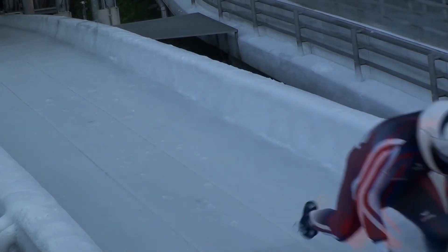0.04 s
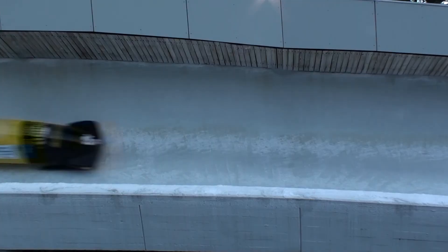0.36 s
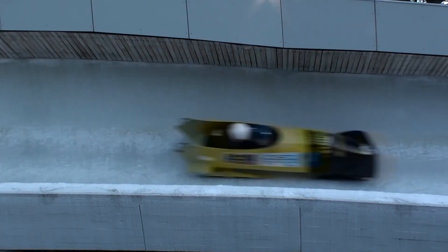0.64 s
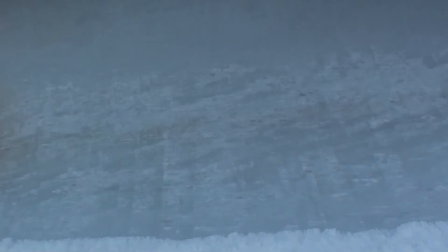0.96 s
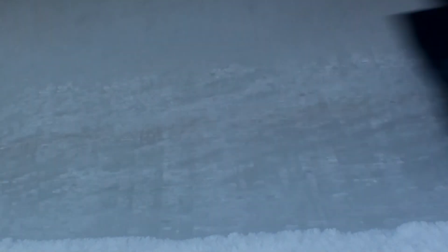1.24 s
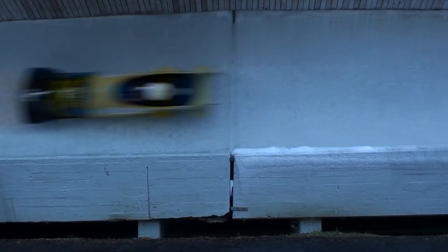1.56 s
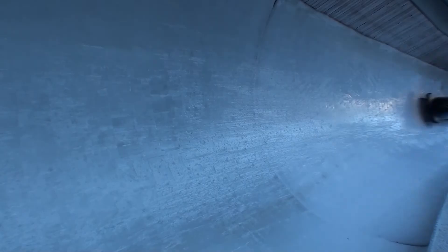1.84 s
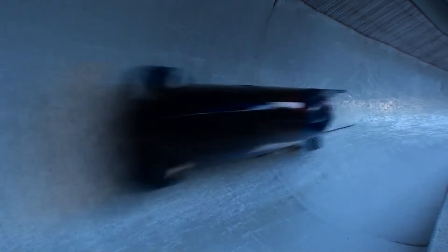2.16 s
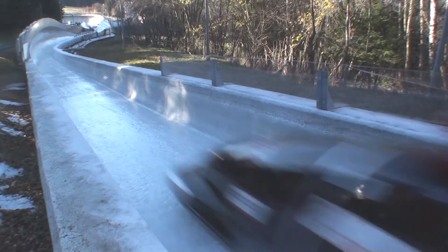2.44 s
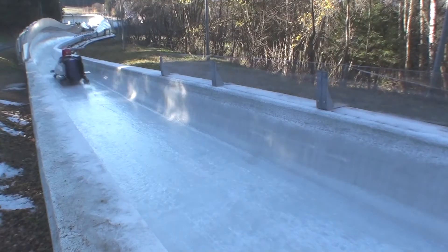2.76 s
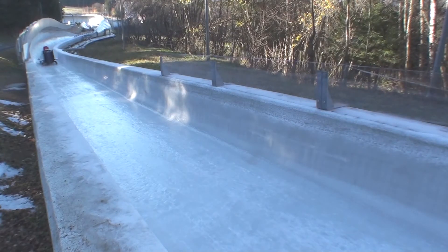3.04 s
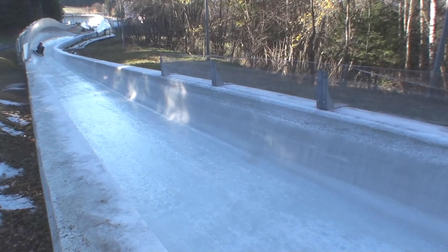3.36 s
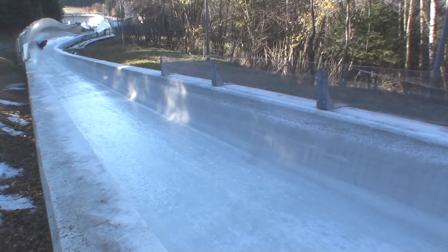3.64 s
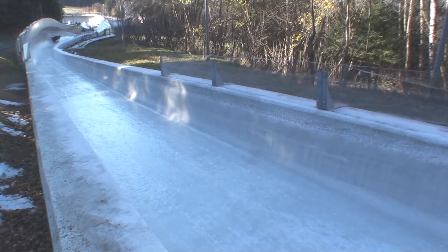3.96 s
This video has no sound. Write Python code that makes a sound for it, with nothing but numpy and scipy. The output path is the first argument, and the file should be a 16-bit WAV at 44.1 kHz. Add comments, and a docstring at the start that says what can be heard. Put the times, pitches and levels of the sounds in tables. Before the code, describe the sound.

Bobsleds rush past on an ice track with a hollow rumble and scraping runners.

```python
"""Bobsleds rush past on an ice track. From the start, rippled ice makes a hollow hull rumble and boom, while
steel runners scrape, chatter and throw ice spray over faint outdoor air. Almost at once, ridges make the
runners tick and bumps thump the hull; soon a skid gives the first short squeal. From about 1 s, runners grind
in the banked curves, and a few short, dry clicks sound. After about 2.5 s the last sled runs away down a
straight, sinking in pitch as its rumble fades."""
import sys
import numpy as np
from scipy import signal
from scipy.fft import rfft, irfft
from scipy.io import wavfile

SR = 44100
rng = np.random.default_rng(int(sys.argv[2]) if len(sys.argv) > 2 else 0)


def wav_record(signal):
    """Record a signal, one row per channel, as 16-bit PCM in the file named by sys.argv[1]."""
    frames = np.transpose(np.atleast_2d(signal))
    bounded = np.clip(frames, -1, 1)
    # unit amplitude maps onto the largest positive 16-bit level
    quanta = np.round(bounded * 32767).astype(np.int16)
    wavfile.write(sys.argv[1], SR, quanta)


N = 176400
TIME = np.arange(N) / SR

# How loud the hull's deep rumble and higher roar are (t/s, level/dB). All table levels are relative.
RUMBLE_LEVEL = [(0, -27), (.16, -18.5), (.6, -18), (1.2, -18.5), (1.4, -19), (1.55, -21.5), (1.63, -15),
                (1.72, -17), (2.1, -17.5), (2.35, -15), (2.6, -18.5), (2.8, -23), (3.15, -28), (3.5, -34.5),
                (3.75, -41.5), (4, -40)]
ROAR_LEVEL = [(0, -23.5), (.06, -24), (.1, -17.5), (.2, -17.5), (.27, -24), (.35, -27.5), (.39, -18),
              (.5, -18.5), (.6, -17.5), (.8, -18.5), (.93, -16.5), (1.0, -15), (1.3, -15), (1.36, -19),
              (1.62, -18.5), (1.69, -17), (1.9, -18), (2.3, -17), (2.6, -16), (2.72, -20), (2.88, -21.5),
              (2.97, -18), (3.21, -22.5), (3.29, -17), (3.5, -18), (3.6, -21), (3.85, -20.5), (3.92, -20.5),
              (4, -16.5)]
# Their tone colour: how strong each frequency is (f/Hz, level/dB)
RUMBLE_COLOUR = [(12, -24), (28, -13), (50, -11.5), (68, 1), (88, 3), (125, 4), (165, 3), (230, -15),
                 (400, -41.5)]
ROAR_COLOUR = [(60, -33), (130, -27.5), (200, 1), (300, -1.5), (450, -2), (620, -2.5), (820, -5),
               (1000, -14.5), (1200, -25), (1900, -60)]
# The booming note of the hollow hull (t/s, f/Hz, level/dB)
BOOM_NOTE = [(0, 193, -17.5), (.35, 170, -29.5), (.53, 167.6, -18), (.68, 171.5, -24), (1.15, 175, -36),
             (1.27, 173.6, -20.5), (1.43, 159, -14.5), (1.54, 155.8, -17), (1.59, 167.2, -15),
             (1.75, 168, -31), (1.88, 182, -14.5), (2.07, 190, -19.5), (2.22, 149, -17.5),
             (2.32, 166.6, -19), (2.45, 170.9, -31), (2.56, 166.9, -17), (2.67, 200.3, -21.5),
             (2.74, 206.3, -15.5), (3, 183, -22.5), (3.2, 194.4, -35), (3.42, 207, -19), (3.6, 200, -36.5)]
# Doppler effect: a sled sounds higher coming and lower leaving (t/s, frequency ratio)
DOPPLER_RATIO = [(0, 0.98), (.25, 0.97), (.33, 0.98), (.7, 0.94), (.8, 0.99), (.97, 0.97), (1.05, 1.064),
                 (1.33, 1.03), (1.5, 1.01), (1.68, 0.94), (1.77, 1.07), (2.2, 0.98), (2.45, 1.075),
                 (2.7, 0.93), (4, 0.84)]

# How hard the runners chatter; it evens out as the last sled leaves (t/s, depth factor)
CHATTER_DEPTH = [(0, 0.67), (.4, 1.26), (2.35, 0.82), (2.5, 0.86), (4, .6)]
# How loud the runners' scrape, hiss, ice spray and grinding in curves are (t/s, level/dB)
SCRAPE_LEVEL = [(0, -28.5), (.12, -36.5), (.24, -31.5), (.27, -41), (.35, -43.5), (.39, -26.5), (.55, -33),
                (.65, -28.5), (.9, -29.5), (1.05, -28.5), (1.3, -27), (1.47, -21.5), (1.65, -26.5),
                (1.95, -25), (2.2, -26.5), (2.3, -31.5), (2.5, -31.5), (2.54, -30.5), (2.63, -29.5),
                (2.72, -34.5), (2.87, -37.5), (2.97, -34.5), (3.15, -39), (3.4, -38.5), (3.8, -44),
                (4, -40)]
HISS_LEVEL = [(0, -50.5), (.33, -47), (.4, -35), (.6, -40.5), (.88, -36.5), (.93, -37.5), (1.0, -35.5),
              (1.15, -34.5), (1.32, -36.5), (1.36, -29), (1.5, -31), (1.62, -27.5), (1.7, -34.5),
              (1.8, -32.5), (2.1, -31.5), (2.37, -32.5), (2.385, -42), (2.6, -39), (2.85, -45),
              (2.97, -38.5), (3.17, -48.5), (3.33, -43), (3.48, -41), (3.8, -50.5), (4, -41.5)]
SPRAY_LEVEL = [(0, -55), (.25, -87), (.3, -52.5), (.4, -59), (.55, -58.5), (.88, -56.5), (.95, -58),
               (1.02, -49), (1.06, -50), (1.2, -52), (1.31, -55), (1.36, -50.5), (1.6, -45), (1.8, -53),
               (2.0, -51.5), (2.37, -46.5), (2.385, -59), (2.6, -56.5), (2.85, -66), (2.98, -56.5),
               (3.15, -69), (3.4, -62.5), (4, -70)]
GRIND_LEVEL = [(0, -67), (.9, -50), (1.0, -29), (1.4, -40.5), (1.9, -27.5), (2.35, -29), (2.55, -41),
               (4, -59)]
# The tone colour of those four sounds (f/Hz, level/dB)
SCRAPE_COLOUR = [(600, -30), (1000, -10.5), (1230, -12), (1550, 2.5), (1850, 0), (2250, -0.5),
                 (2700, -15.5), (3500, -16), (6000, -60)]
HISS_COLOUR = [(1800, -30), (2550, -1), (3000, -7), (3750, -1.5), (4400, -6), (5300, -13.5), (6500, -23.5),
               (10000, -54)]
SPRAY_COLOUR = [(3500, -32), (5500, -1), (6800, 1), (8500, -4.5), (9800, -9), (11800, -11), (13000, -18),
                (16000, -21)]
GRIND_COLOUR = [(500, -20.5), (900, -1.5), (1150, -3), (1400, -3), (2000, -19), (4000, -50.5)]
# A runner scuffs up a puff of ice (t/s, peak level/dB)
ICE_PUFFS = [(.18, -64), (0.383, -38.5), (0.453, -40), (0.641, -43.5), (.766, -49), (0.915, -44),
             (1.712, -44), (1.901, -51), (2.029, -65), (2.28, -52), (2.45, -55), (3.025, -56)]

# The tone colour of the outdoor air (f/Hz, level/dB)
AIR_COLOUR = [(12, -11), (30, 0), (60, -4), (150, 0), (1000, -11.5), (5500, -28), (7500, -54.5),
              (12000, -44.5), (16000, -52.5)]
# Runners hit ridges (t/s, high ring level/dB, high ring f/Hz, low ring level/dB above the high one)
RIDGE_HITS = [(0.0225, -24.5, 3700, 9.5), (0.078, -18.5, 3770, 3.5), (0.096, -30.5, 3900, 22.5),
              (0.181, -20.5, 3940, 8.5), (0.2372, -25.5, 2700, 15), (0.382, -20, 3800, -1),
              (0.6425, -19.5, 4070, 8), (0.7676, -12, 3940, -2.5), (0.9163, -12.5, 4400, -1),
              (1.1224, -12.5, 2900, -15), (1.1675, -20, 3800, -20), (1.712, -13.5, 3320, -16),
              (1.901, -17, 4760, 0), (2.029, -22, 4900, -6), (2.4512, -14, 4400, 0),
              (2.528, -15.5, 3730, 8.5), (2.538, -17, 2500, 5), (2.574, -13, 3570, 6),
              (2.592, -23.5, 3400, 12), (2.619, -23, 2570, 12), (2.663, -19, 3220, -3),
              (2.6981, -13, 3100, -15), (2.7166, -18, 3340, -17), (2.7545, -18, 3270, -16),
              (2.7838, -14.5, 3300, -5.5), (3.026, -20, 3110, -9), (3.0599, -20.5, 2970, -1),
              (3.2822, -19, 3200, -14), (3.3901, -18, 3450, -4), (3.4372, -22, 3396, 0.5)]
# The hull hits larger bumps (t/s, peak level/dB, f/Hz, time to fade by 60 dB/s)
BUMP_HITS = [(.094, -12, 553.7, 0.24), (.125, -9, 501.5, 0.22), (.386, -11.5, 356, 0.24),
             (.388, -14, 586.5, 0.11), (.477, -12, 365, 0.27), (.552, -12, 613, 0.45),
             (.678, -9.5, 431, 0.14), (.742, -8.5, 441, 0.24), (1.599, -13.5, 118.7, 0.42),
             (1.69, -9.5, 664.4, 0.13), (2.026, -11, 258, 0.33), (2.45, -14.5, 120, 0.58),
             (2.936, -12, 526.5, 0.13), (3.281, -15, 622, 0.14), (3.613, -11, 554, 0.11),
             (3.637, -14.5, 561, 0.14), (3.771, -14, 512.5, 0.11)]
# A runner skids (t/s, length/s, f/Hz, level/dB)
SKIDS = [(0.296, 0.065, 5230, -42), (0.921, 0.037, 5950, -34.5), (1.245, 0.026, 3870, -29),
         (1.344, 0.053, 5250, -31), (1.756, 0.082, 4300, -30.5)]
# Short, dry clicks (t/s, peak level/dB)
DRY_CLICKS = [(0.9758, -18), (1.3347, 0), (1.736, -12), (2.3743, -12)]

# How alike the left and right microphones sound (f/Hz, likeness from 0 to 1)
STEREO_LIKENESS = [(300, 1), (820, 0.87), (1120, 0.39), (1350, .5), (1650, 0.76), (2600, 0.12),
                   (3800, 0.52), (5000, 0.43), (8300, 0.25), (13000, .5)]
# Which side is louder, before the lean below is applied (f/Hz, left minus right level/dB)
STEREO_BALANCE = [(80, 1.5), (250, -.5), (550, -2.5), (850, -6.5), (1050, -9.5), (1350, 1.5), (1700, -3),
                  (2300, -8), (3000, -2), (3700, -1.5), (6000, 2.5), (8300, 5), (12000, 1)]
# The middle range leans right while a sled is near (t/s, factor on the balance below about 1 kHz)
STEREO_LEAN = [(0, 1.1), (.25, 1), (.3, .6), (.93, 1.3), (1.01, 0.45), (1.3, 1.4), (1.69, 0.89), (1.8, 1.6),
               (2.35, 0.64), (2.42, 1.25), (2.75, 0.71), (4, 0.34)]
# How far the left wave runs ahead of the right (f/Hz, phase/rad)
LEFT_LEAD = [(10, 0), (70, -.45), (250, -.68), (550, -.7), (850, -1.05), (1000, -1.7), (1120, -3.6),
             (1450, -5.8), (2200, -6.6), (2750, -8.8), (3300, -6.4), (4000, -5.6), (5400, -5.7),
             (6300, -8.7), (7500, -9.2), (8700, -11.9), (12500, -12.55)]


def amp(db):
    """Turns decibels into a number to multiply a sound by."""
    return 10 ** (np.asarray(db) / 20)


def unit(x):
    """Scales a signal so that its average strength (rms) is 1."""
    return x / np.sqrt(np.mean(x ** 2) + 1e-20)


def over_hz(points, hz):
    """Reads a table at any frequency, giving each octave about equal room."""
    f, value = np.transpose(points)
    return np.interp(np.log(hz + 1), np.log(f + 1), value)


def over_time(points, column=1):
    """Reads one column of a table at every sample."""
    table = np.array(points)
    return np.interp(TIME, table[:, 0], table[:, column])


def add(mix, s, sound):
    """Mixes a sound in, starting at s seconds."""
    part = mix[..., max(round(s * SR), 0):][..., :sound.shape[-1]]
    part += sound[..., :part.shape[-1]]


def wobble(low_hz, high_hz):
    """Random motion of strength 1, mostly between two rates."""
    hz = np.fft.rfftfreq(N, 1 / SR)
    spectrum = rfft(rng.standard_normal(N))
    return unit(irfft(spectrum * hz / (hz + low_hz) / (1 + (hz / high_hz) ** 2), N))


def strike(t, rise_s, fade_s):
    """The loudness of a hit: a quick rise, then a fall of 60 dB every fade_s."""
    return np.clip(t / rise_s, 0, 1) * amp(-60 * np.maximum(t - rise_s, 0) / fade_s)


def tone(count, hz, waver, waver_hz):
    """A clear note for each side, whose pitch wanders by the fraction waver."""
    smoothing = signal.butter(2, waver_hz, fs=SR, output="sos")
    drift = unit(signal.sosfilt(smoothing, rng.standard_normal((2, count))))
    turns = np.cumsum(hz * (1 + waver * drift), axis=1) / SR + rng.random((2, 1))
    return np.sqrt(2) * np.sin(2 * np.pi * turns)


def resonate(x, hz, width_hz):
    """Keeps the part of a sound that lies close to hz."""
    spin = np.exp(2j * np.pi * np.cumsum(hz * np.ones(len(x))) / SR)
    decay = np.exp(-np.pi * width_hz / SR)
    return (spin * signal.lfilter([(1 - decay) ** 2], [1, -2 * decay, decay ** 2], x / spin)).real


def ring(count, hz, width_hz):
    """A fuzzy note for each side: a narrow band of noise with its loudness evened out."""
    band = signal.hilbert([resonate(x, hz, width_hz) for x in rng.standard_normal((2, count))])
    power = abs(band) ** 2
    return unit(band.real / np.sqrt(power + .4 * np.mean(power)))


def microphones(pair):
    """Turns two unrelated signals into what a left and a right microphone pick up."""
    frames = dict(fs=SR, nperseg=4096, noverlap=3072)
    hz, t, (shared, separate) = signal.stft(pair, **frames)
    hz = hz[:, None]
    lean = np.interp(t, *np.transpose(STEREO_LEAN)) ** (1 / (1 + (hz / 1000) ** 4))
    left_gain = amp(over_hz(STEREO_BALANCE, hz) * lean)
    likeness = np.clip(over_hz(STEREO_LIKENESS, hz), 0, 1)
    blend = likeness * shared + np.sqrt(1 - likeness ** 2) * separate
    left = blend * left_gain * np.exp(1j * over_hz(LEFT_LEAD, hz))
    same_power = np.sqrt(2 / (1 + left_gain ** 2))
    return signal.istft(np.array([left, shared]) * same_power, **frames)[1][:, :N]


def friction(colour, shake_db, grain, grains_per_s, flicker_db, patch_hz, patch_s, doppler=1, size=512):
    """Sliding on ice: a dense rush plus separate grains. doppler=0 turns the pitch shift off."""
    grains = rng.standard_normal((2, N)) * (rng.random(N) < grains_per_s / SR)
    rush = (rng.standard_normal((2, N)) + grain * unit(grains)) * amp(shake_db)
    frames = dict(fs=SR, nperseg=size, noverlap=size - size // 4)
    hz, t, spectrum = signal.stft(rush, **frames)
    # Random patches of frequency and time get louder or softer, so the tone flickers.
    across, along = np.fft.fftfreq(len(hz), hz[1])[:, None], np.fft.fftfreq(len(t), t[1])
    blur = np.exp(-(across * patch_hz) ** 2 - (along * patch_s) ** 2)
    patches = unit(np.fft.ifft2(np.fft.fft2(rng.standard_normal(spectrum.shape)) * blur).real)
    sled_hz = hz[:, None] / np.interp(t, *np.transpose(DOPPLER_RATIO)) ** doppler
    treble_cut = 1 + (sled_hz / colour[-1][0]) ** 2
    gain = amp(over_hz(colour, sled_hz) + flicker_db * patches) / treble_cut
    pair = microphones(signal.istft(spectrum * gain, **frames)[1][:, :N])
    middle = pair.mean(0)
    return pair / np.sqrt(np.mean(middle ** 2) + 1e-20)


def hull(bumps):
    """The sled's hollow shell rumbles, roars and booms as it rides over rippled ice."""
    rumble = friction(RUMBLE_COLOUR, shake_db=0, grain=0.23, grains_per_s=190,
                      flicker_db=-0.5, patch_hz=150, patch_s=0.059, doppler=0, size=4096)
    roar = friction(ROAR_COLOUR, shake_db=0.52 * bumps, grain=0.35, grains_per_s=300,
                    flicker_db=1.5, patch_hz=199, patch_s=0.06, doppler=0.7, size=2048)
    note = tone(N, over_time(BOOM_NOTE), waver=0.0448, waver_hz=23.2)
    throb = unit(amp(4 * wobble(low_hz=6, high_hz=17)))
    boom = microphones(note * throb)
    return (rumble * amp(over_time(RUMBLE_LEVEL) - 1.3)
            + roar * amp(over_time(ROAR_LEVEL) + 2)
            + boom * amp(over_time(BOOM_NOTE, column=2) - 1.5))


def runners(bumps):
    """The steel blades chatter as they scrape, hiss, spray ice and grind under load in the curves."""
    chatter = over_time(CHATTER_DEPTH) * unit(bumps + wobble(low_hz=2.9, high_hz=119))
    scrape = friction(SCRAPE_COLOUR, shake_db=2.44 * chatter, grain=0.28, grains_per_s=130,
                      flicker_db=2, patch_hz=300, patch_s=0.057)
    hiss = friction(HISS_COLOUR, shake_db=2.6 * chatter, grain=0.14, grains_per_s=160,
                    flicker_db=4, patch_hz=402, patch_s=0.044)
    spray = friction(SPRAY_COLOUR, shake_db=2.7 * chatter, grain=0.26, grains_per_s=330,
                     flicker_db=3, patch_hz=500, patch_s=0.072, doppler=0.42)
    grind = friction(GRIND_COLOUR, shake_db=2.3 * chatter, grain=0.8, grains_per_s=94,
                     flicker_db=4.5, patch_hz=200, patch_s=0.091, doppler=0, size=1024)
    puffs = sum(amp(db) * strike(TIME - s, rise_s=0.0011, fade_s=0.079) for s, db in ICE_PUFFS)
    return (scrape * amp(over_time(SCRAPE_LEVEL) - 0.58)
            + hiss * amp(over_time(HISS_LEVEL) + 0.47)
            + spray * (amp(over_time(SPRAY_LEVEL) + 1.5) + puffs)
            + grind * amp(over_time(GRIND_LEVEL)))


def outdoor_air():
    """A faint, steady outdoor rumble and hiss."""
    hz = np.fft.rfftfreq(N, 1 / SR)
    spectrum = rfft(rng.standard_normal((2, N))) * amp(over_hz(AIR_COLOUR, hz))
    return amp(-36) * unit(microphones(irfft(spectrum, N)))


def runner_ticks():
    """Each ridge in the ice makes a runner ring briefly with a high and a low note."""
    out, t = np.zeros((2, N)), np.arange(SR // 10) / SR
    loudness = strike(t, rise_s=0.00062, fade_s=0.048)
    for s, db, hz, low_db in RIDGE_HITS:
        high = ring(len(t), hz, width_hz=700)
        low = amp(low_db) * ring(len(t), hz=1670, width_hz=540)
        add(out, s, amp(db - 8) * loudness * (high + low))
    return microphones(out)


def hull_thumps():
    """A bump sets a hull panel ringing with a hollow, slightly falling note."""
    out, t = np.zeros((2, N)), np.arange(SR // 3) / SR
    pitch_fall = 1 - 0.7 * t
    for s, db, hz, fade_s in BUMP_HITS:
        note = tone(len(t), hz * pitch_fall, waver=0.038, waver_hz=71)
        add(out, s, amp(db - 1.5) * strike(t, rise_s=0.0044, fade_s=fade_s) * note)
    return microphones(out)


def skid_squeals():
    """A skidding runner gives a short, raspy squeal that swells and fades."""
    out = np.zeros((2, N))
    for s, length_s, hz, db in SKIDS:
        swell = np.sin(np.linspace(0, np.pi, round(length_s * SR)))
        add(out, s, amp(db) * swell * ring(len(swell), hz, width_hz=750))
    return microphones(out)


def dry_clicks():
    """A short, dry click."""
    out, t = np.zeros(N), np.arange(SR // 100) / SR
    decay_s = 0.00024
    for s, db in DRY_CLICKS:
        add(out, s, amp(db) * np.exp(-t / decay_s))
    return out


def scene():
    """Adds up all the sounds. The same bumps in the ice shake both hull and runners."""
    bumps = wobble(low_hz=1.9, high_hz=38.2)
    return (hull(bumps) + runners(bumps) + outdoor_air()
            + runner_ticks() + hull_thumps() + skid_squeals() + dry_clicks())


def record(dry):
    """Rounds off the loudest peaks, then removes the very highest treble."""
    rounded = dry / (1 + dry ** 8) ** (1 / 8)
    cutoff_hz = 15900
    low_pass = signal.firwin(511, cutoff_hz, window=("kaiser", 9), fs=SR)
    return signal.oaconvolve(rounded, low_pass[None], "same")


dry = scene()
out = record(dry)
wav_record(out)
```